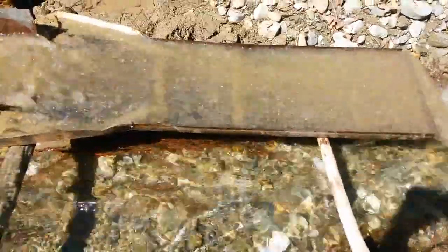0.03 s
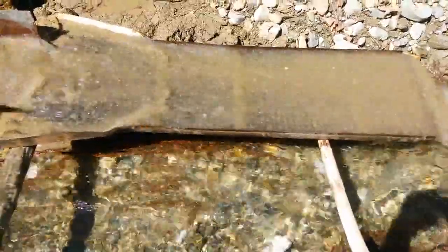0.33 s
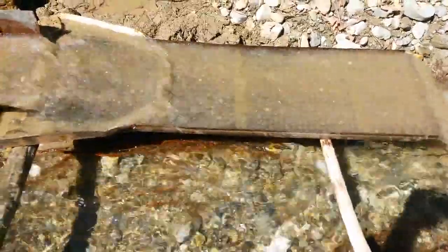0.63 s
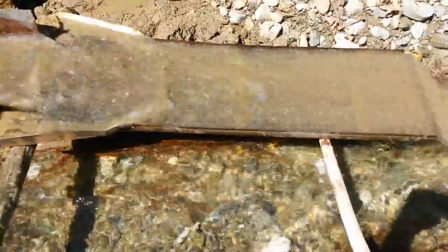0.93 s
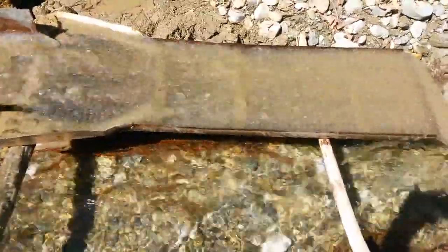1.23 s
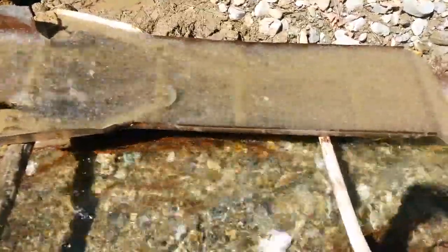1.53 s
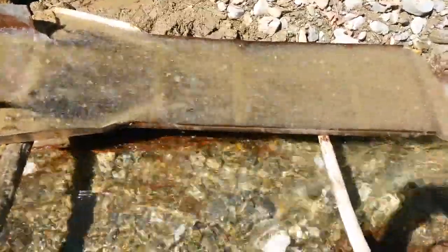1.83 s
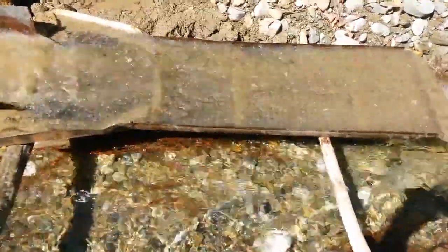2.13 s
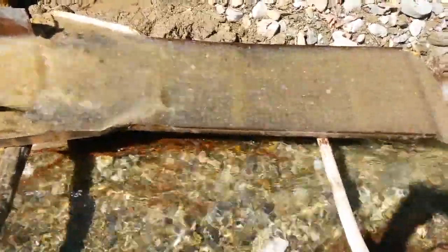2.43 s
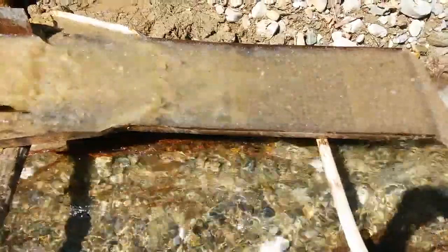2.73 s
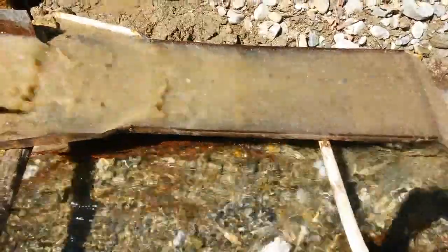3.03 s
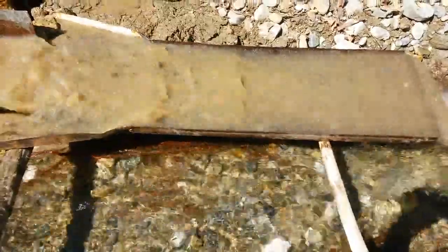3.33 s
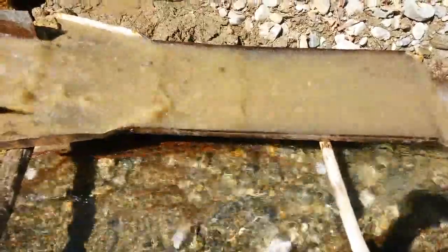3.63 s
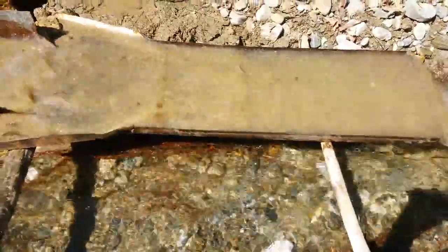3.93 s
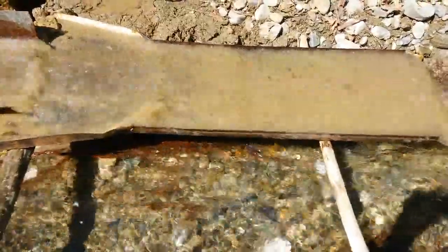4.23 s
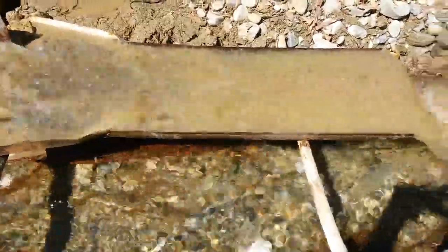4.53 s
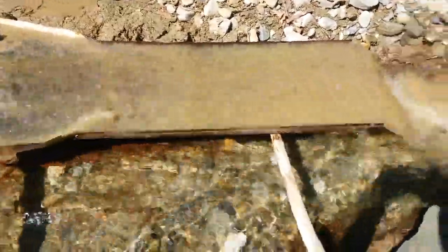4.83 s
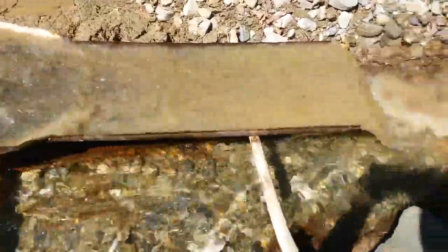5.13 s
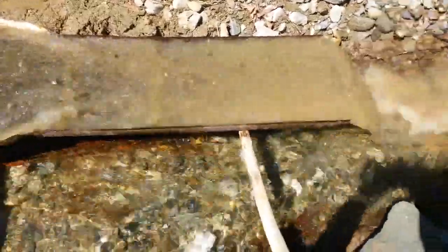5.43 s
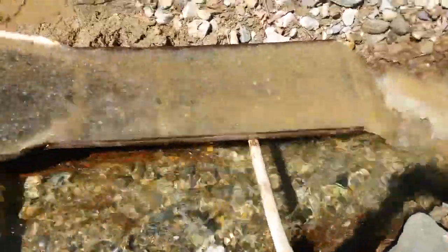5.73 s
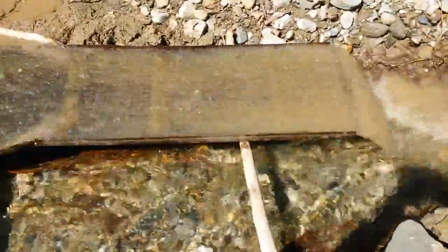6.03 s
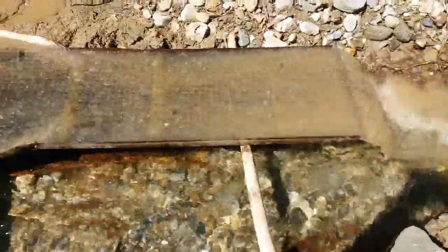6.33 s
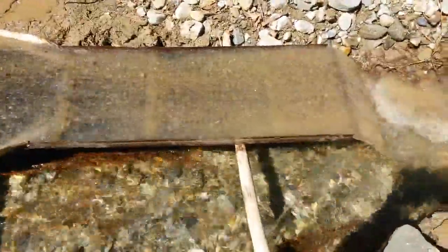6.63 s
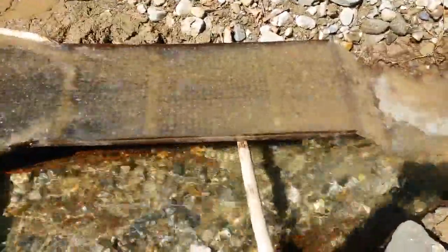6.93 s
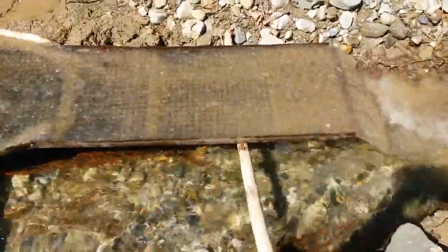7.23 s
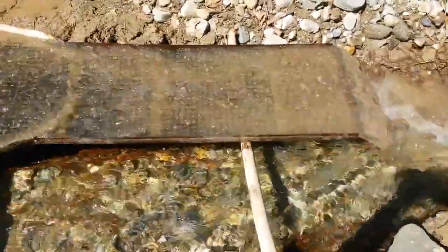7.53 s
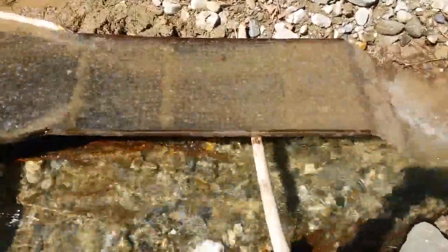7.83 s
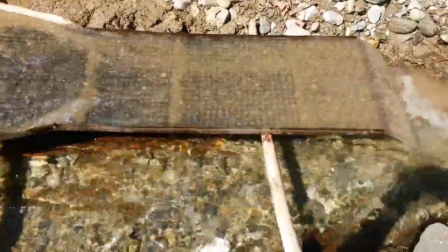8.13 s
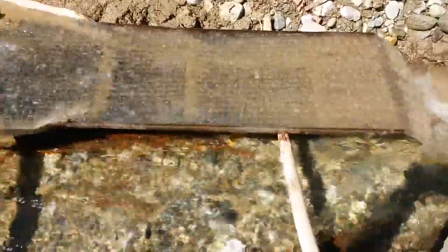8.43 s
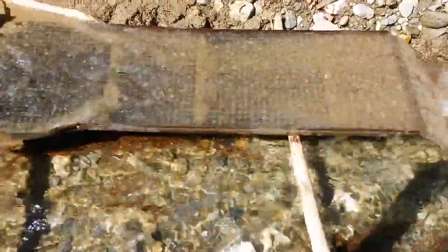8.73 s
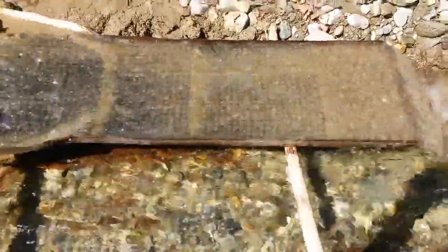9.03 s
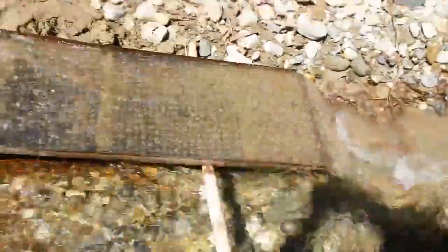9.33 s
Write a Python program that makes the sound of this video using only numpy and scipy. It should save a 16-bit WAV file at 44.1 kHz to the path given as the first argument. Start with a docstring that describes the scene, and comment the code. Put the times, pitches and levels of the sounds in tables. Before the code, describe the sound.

Close by outdoors, a rush of wet grit and splashing water opens, with small stones crunching and lumps slapping into a sluice box. A second strong load follows, then smaller washes of gravel, with bubbles and droplets over the faint fizz of a stream. Light wind puffs on the stereo microphone throughout, ending in a loud, crackling buffet on the left.

```python
"""Muddy water runs through a sluice box in a shallow stream while wet gravel is fed in at its head.
Loads slide and crunch, clods thud into the water, droplets plink; the current fizzes and burbles below.
Heard close by on a stereo microphone with a bright right port and a muffled left one, which swings
downstream midway. A breeze rumbles on both ports, and a last gust overloads the left."""
import sys
import numpy as np
from scipy import signal
from scipy.fft import rfft, irfft
from scipy.io import wavfile

SR = 44100
rng = np.random.default_rng(int(sys.argv[2]) if len(sys.argv) > 2 else 0)


def generate_wav(sig):
    """Save sig (samples, or channels by samples) to the path in sys.argv[1] as 16-bit PCM at SR."""
    pcm = np.round(np.clip(np.atleast_2d(sig).T, -1, 1) * 32767).astype(np.int16)
    wavfile.write(sys.argv[1], SR, pcm)


N = 414540
TIME, FREQ = np.arange(N) / SR, np.maximum(np.arange(N // 2 + 1) * SR / N, 1)


def undb(db):
    """Decibels to gain."""
    return 10 ** (np.asarray(db) / 20)


def across(points):
    """Join (Hz, value) points on a log-frequency axis."""
    hz, value = np.transpose(points)
    return np.interp(np.log(FREQ), np.log(hz), value)


def colour(x, points):
    """Filter x by a curve of (Hz, dB) points and scale it to an rms of 1."""
    y = irfft(rfft(x) * undb(across(points)), N)
    return y / y.std()


def resonances(modes):
    """Gain over frequency of a few (Hz, width Hz, dB) peaks."""
    return undb(sum(db / (1 + (2 * (FREQ - hz) / width) ** 2) for hz, width, db in modes))


def add(out, s, sound):
    """Mix a short sound into out at s seconds."""
    start = max(int(s * SR), 0)
    out[..., start:start + sound.shape[-1]] += sound[..., :max(N - start, 0)]


def impacts(rate, spread_db):
    """Randomly timed impulses of scattered level, about rate a second."""
    out, size = np.zeros(N), rng.exponential(size=N)
    hit = rng.random(N) < rate / SR
    out[hit] = undb(spread_db * np.minimum(size[hit], 4))
    return out


def grains(rate, spread_db):
    """Impacts heard two ways: directly (row 0) and scattered (row 1)."""
    return impacts(rate, spread_db) * rng.standard_normal((2, N))


def surges(rate, spread_db, fade_s, depth):
    """Gain of a chain of little surges, each starting at once and dying away."""
    power = signal.lfilter([1], [1, -np.exp(-1 / (fade_s * SR))], impacts(rate, spread_db) ** 2)
    return np.sqrt(1 - depth + depth * power / power.mean())


def bursts(rows, rise_s, hold_s):
    """Gain of (s, dB, t60) bursts that build up, hold briefly and fade."""
    power, t = np.zeros(N), TIME[:SR // 2]
    attack = 1 - np.exp(-t / rise_s)
    for s, db, t60 in rows:
        add(power, s, (attack * undb(db - 60 * np.maximum(t - hold_s, 0) / t60)) ** 2)
    return np.sqrt(power)


def swell(s, build_s, hold_s, t60):
    """Gain that builds up from s seconds, gently at first, holds at 1 and dies away."""
    gain, age = np.zeros(N), TIME[TIME < build_s + hold_s + t60]
    fade_db = -60 * np.maximum(age - build_s - hold_s, 0) / t60
    add(gain, s, np.clip(age / build_s, 0, 1) ** 1.6 * undb(fade_db))
    return gain


def bubble(hz, cycles, glide):
    """A ringing air pocket whose pitch climbs as it nears the surface."""
    age = np.arange(int(SR * cycles / hz) + 2) * hz / SR / cycles
    return np.sin(2 * np.pi * cycles * age * (1 + glide * age / 2)) * np.exp(-np.log(100) * age)


def bubbles(low_hz, high_hz, cycles, spread_db, count):
    """Bubbles of many sizes at random times, direct and scattered, rms 1."""
    out = np.zeros((2, N))
    for when, pitch, faintness, side in rng.random((count, 4)):
        ring = bubble(low_hz * (high_hz / low_hz) ** pitch, cycles, glide=0.16)
        gain = undb(-spread_db * np.log(max(faintness, .02)))
        add(out, when * N / SR, gain * np.outer([1, 2 * side - 1], ring))
    return out / out.std()


# The microphone's swing. Each row: time in seconds, share of the turn from 0 to 1.
MIC_SWING = [(3.6, 0.14), (4.8, 1)]

def turn():
    """How far the microphone has swung downstream, 0-1."""
    return np.interp(TIME, *np.transpose(MIC_SWING))


# The fizz over the riffles. Each row: frequency in Hz, relative level in dB.
FIZZ_SPECTRUM = [(110, -30), (180, -10), (572, -5.5), (771, -7), (1000, -7), (1540, -8.5), (1920, -5),
                 (2270, -6.5), (3620, -6), (4880, -6.5), (6820, -1), (9370, -18), (15500, -29.5)]

def stream(churn_level):
    """The current fizzes in wavelets and burbles, livelier for a moment when gravel stirs it."""
    fizz = colour(grains(rate=9000, spread_db=-1), FIZZ_SPECTRUM)
    wavelets = surges(rate=130, spread_db=2.5, fade_s=0.008, depth=0.42)
    burble = undb(-15) * bubbles(low_hz=650, high_hz=2300, cycles=18, spread_db=2, count=600)
    spray = undb(-9) * bubbles(low_hz=5900, high_hz=7400, cycles=32, spread_db=2.5, count=900)
    spray *= undb(3 * turn())  # grows as the microphone turns to the outfall
    settle_s = 0.12
    keep = np.exp(-1 / (settle_s * SR))
    stirred = signal.lfilter([1 - keep], [1, -keep], churn_level)
    flow = np.hypot(undb(-35), undb(-6.5) * stirred)
    return flow * (undb(0.08) * fizz * wavelets + burble + spray)


# Puffs of air right on the microphone. Each row: start in seconds, level in dB.
BREEZE_PUFFS = [(0.3, -37), (0.53, -39), (0.72, -39), (0.84, -33), (1.33, -33), (1.5, -38), (1.71, -34),
                (1.88, -39), (2.1, -37), (2.72, -30), (3.44, -37), (3.68, -33), (3.82, -38), (4.19, -38),
                (4.56, -39), (4.9, -37), (5.12, -34), (5.38, -35), (5.7, -39), (6.79, -37), (6.95, -40),
                (7.49, -34)]

def breeze():
    """Light air rumbles steadily on each port separately and puffs up now and then."""
    rumble = colour(rng.standard_normal((2, N)),
                    [(8, 4.5), (25, -2), (60, -4), (110, -8), (200, -21), (500, -29), (2000, -80)])
    flutter = np.array([surges(rate=14, spread_db=-1, fade_s=0.01, depth=0.53) for _ in range(2)])
    puff_power = sum((undb(db) * swell(s, build_s=0.025, hold_s=0.04, t60=0.5)) ** 2
                     for s, db in BREEZE_PUFFS)
    return rumble * flutter * np.sqrt(undb(-45) ** 2 + puff_power)


# Loads sliding in at the head of the box. Each row: start, build-up, hold and t60 in seconds,
# then relative levels of grit and of churned water in dB.
GRAVEL_LOADS = [(0.05, 0.28, 0.0, 0.24, -15, -17.5), (0.39, 0.04, 0.05, 0.45, -27, -19.5),
                (0.52, 0.06, 0.15, 0.5, -28, -24), (0.75, 0.06, 0.15, 0.8, -36, -39),
                (1.09, 0.1, 0.06, 1.1, -33.5, -33), (1.71, 0.04, 0.17, 1.4, -29.5, -28.5),
                (2.62, 0.04, 0.08, 0.85, -20, -23), (2.8, 0.14, 0.08, 1.15, -23.5, -23.5),
                (3.23, 0.02, 0.07, 0.3, -40, -31), (5.15, 0.14, 0.01, 0.45, -27.5, -38),
                (5.36, 0.15, 0.19, 0.75, -27, -32.5), (6.99, 0.045, 0.01, 0.3, -26.5, -33),
                (7.06, 0.07, 0.14, 0.7, -28.5, -34), (8.1, 0.07, 0.0, 0.3, -32, -37),
                (8.15, 0.14, 0.17, 0.2, -33, -31), (8.49, 0.025, 0.16, 0.35, -27, -28.5),
                (8.72, 0.05, 0.03, 0.8, -25.5, -28), (9.29, 0.02, 0.07, 0.4, -28, -44)]

def loads():
    """Levels over time of the sliding grit and of the water it churns; both swell with each load."""
    power = sum(np.outer(undb([grit_db, churn_db]), swell(*shape)) ** 2
                for *shape, grit_db, churn_db in GRAVEL_LOADS)
    return np.sqrt(power)


# Grit with the microphone facing it, then turned downstream.
# Each row: frequency in Hz, relative level in dB.
GRIT_FACING = [(530, -39), (900, -5.5), (1210, -4.5), (1400, -4.5), (1770, -2.5), (2570, -7), (3300, -5),
               (3670, -7), (4180, -1.5), (5700, -1), (7060, 3.5), (10100, -21.5), (14600, -26),
               (15500, -35)]
GRIT_DOWNSTREAM = [(410, -32), (700, -17), (757, -11), (900, -8.5), (1220, -9), (1600, -10), (2000, -11.5),
                   (2990, -10.5), (3270, -10), (3870, -6), (5290, -8), (6760, 4), (7250, 2), (9350, -16),
                   (15500, -31.5)]

def wet_grit():
    """Hard contacts mix with tiny ringing bubbles; the tone shifts as the microphone swings."""
    contacts = grains(rate=14000, spread_db=1)
    rings = bubbles(low_hz=2870, high_hz=9200, cycles=44, spread_db=1, count=3000)
    grit = contacts / contacts.std() + undb(-10) * rings
    return (1 - turn()) * colour(grit, GRIT_FACING) + turn() * colour(grit, GRIT_DOWNSTREAM)


# Water under the gravel. Each row: frequency in Hz, relative level in dB.
CHURN_SPECTRUM = [(70, -24), (130, -9), (200, -3), (300, -6.5), (400, -5), (550, 0), (800, -2.5),
                  (1200, -3.5), (1900, -6.5), (3000, -7.5), (6000, -29)]

def churned_water():
    """Stirred water splashes and gurgles with bubbles."""
    gurgle = bubbles(low_hz=260.3, high_hz=2207, cycles=16.2, spread_db=1.5, count=2000)
    splash = grains(rate=4300, spread_db=1.8)
    return undb(-1.5) * colour(splash, CHURN_SPECTRUM) + undb(-5) * colour(gurgle, CHURN_SPECTRUM)


# Small heaps of stones giving way. Each row: start in seconds, relative level in dB, t60 in seconds.
HEAP_CRUNCHES = [(0.0792, -20, 0.09), (0.1494, -18.5, 0.08), (0.2538, -12, 0.12), (0.3686, -11.5, 0.05),
                 (0.5217, -13, 0.03), (0.5536, -6.5, 0.1), (0.602, -13, 0.045), (0.8106, -20, 0.052),
                 (0.8824, -21, 0.068), (0.9747, -16, 0.036), (1.052, -15, 0.059), (1.092, -11, 0.08),
                 (1.21, -21, 0.08), (1.332, -13, 0.09), (1.437, -24, 0.3), (1.702, -14.5, 0.099),
                 (1.756, -14.5, 0.09), (1.8813, -15, 0.053), (2.377, -21, 0.1), (2.478, -15, 0.032),
                 (2.5636, -19.5, 0.17), (2.6364, -16, 0.082), (2.715, -15, 0.12), (2.875, -19, 0.16),
                 (2.984, -11, 0.12), (3.052, -15, 0.1), (3.136, -19, 0.074), (3.3992, -21.5, 0.052),
                 (3.489, -17, 0.13), (3.8677, -23.5, 0.12), (3.8985, -22, 0.22), (4.0243, -17, 0.032),
                 (4.371, -18, 0.22), (4.4817, -22, 0.2), (5.118, -20, 0.07), (5.433, -14, 0.08),
                 (5.496, -17.5, 0.12), (5.631, -17, 0.2), (5.749, -16, 0.11), (5.778, -10, 0.11),
                 (5.988, -23, 0.07), (6.0965, -22, 0.052), (6.789, -24, 0.08), (6.9088, -17, 0.11),
                 (7.1914, -16, 0.08), (7.256, -16, 0.11), (7.4463, -23, 0.14), (8.006, -19.5, 0.09),
                 (8.2816, -17.5, 0.1), (8.324, -15.5, 0.059), (8.3888, -15.5, 0.097),
                 (8.4274, -14.5, 0.045), (8.511, -15.5, 0.13), (8.7231, -13, 0.08), (8.7345, -12, 0.059),
                 (8.7693, -8.5, 0.09), (8.917, -19, 0.07), (9.3033, -16, 0.059)]

def gravel(grit_level, churn_level):
    """Gravel slides in little avalanches and crunches as heaps give way, churning the water under it."""
    tumble = surges(rate=240, spread_db=2.0, fade_s=0.0066, depth=0.5)
    crunch = bursts(HEAP_CRUNCHES, rise_s=0.001, hold_s=0.0045)
    grit, churn = wet_grit(), churned_water()
    patter = surges(rate=130, spread_db=3.3, fade_s=0.0038, depth=0.2)
    grit_gain = np.hypot(undb(0.3) * grit_level * tumble * patter, undb(-3.5) * crunch)
    churn_gain = np.hypot(undb(-0.1) * churn_level * tumble, undb(-19.5) * crunch)
    return grit * grit_gain + churn * churn_gain


# The hollow box. Each row: frequency in Hz, width in Hz, boost in dB.
BOX_MODES = [(702, 290, 2), (1130, 120, 3)]

def sluice_box(feed):
    """The box rings under what falls into it; returns a spectrum."""
    return rfft(feed) * resonances(BOX_MODES)


# Clods dropping into the box. Each row: start in seconds, relative level in dB,
# pitch of the trapped air in Hz, t60 of the slap in seconds.
CLOD_DROPS = [(0.327, -11.5, 713, 0.25), (0.421, -10.5, 820, 0.06), (0.554, -6, 274, 0.15),
              (0.571, -8.5, 524, 0.2), (1.05, -14, 616, 0.14), (1.089, -11, 656, 0.25),
              (1.336, -10.5, 407, 0.17), (1.932, -24, 520, 0.2), (2.027, -20, 640, 0.11),
              (2.233, -22, 405, 0.25), (2.349, -26, 676, 0.2), (2.565, -27, 600, 0.25),
              (2.658, -13.5, 370, 0.092), (3.093, -17, 530, 0.11), (3.246, -17, 664, 0.12),
              (3.4, -20, 670, 0.15), (3.506, -19.5, 786, 0.098), (3.658, -24.5, 770, 0.2),
              (5.117, -21.5, 392, 0.16), (5.786, -23, 970, 0.12), (6.807, -24, 463, 0.13),
              (6.907, -20, 680, 0.2), (7.204, -19.5, 778, 0.071), (8.091, -24, 410, 0.18),
              (8.363, -19, 436, 0.071)]
# Their slap. Each row: frequency in Hz, relative level in dB.
SLAP_SPECTRUM = [(60, -13), (130, -12.5), (250, -2), (480, 2.5), (900, -4), (1400, -7.5), (2200, -10.5),
                 (5000, -33)]

def clods():
    """Each clod slaps the water, then the air that it drags under rings briefly."""
    slap_gain = bursts([(s, db, t60) for s, db, _, t60 in CLOD_DROPS], rise_s=0.00052, hold_s=0.0013)
    slaps = slap_gain * colour(grains(rate=4000, spread_db=2.5), SLAP_SPECTRUM)
    plops = np.zeros(N)
    for s, db, hz, _ in CLOD_DROPS:
        add(plops, s + 0.00303, undb(db) * bubble(hz, cycles=21, glide=0.027))
    return undb(-6) * slaps + undb(-3) * plops


# Large single bubbles in the riffles. Each row: start in seconds, relative level in dB, pitch in Hz.
RIFFLE_GULPS = [(3.934, -31.5, 253), (4.016, -29, 859), (4.394, -24, 1410), (4.413, -27.5, 254),
                (4.485, -24.5, 1610), (4.959, -31, 778), (7.144, -22, 970), (7.299, -26, 730)]

def gulps():
    """Larger air pockets ring for a moment as they break loose."""
    out = np.zeros(N)
    for s, db, hz in RIFFLE_GULPS:
        add(out, s, undb(db - 0.5) * bubble(hz, cycles=24, glide=.06))
    return out


# Single drops landing on the current. Each row: start in seconds, relative level in dB.
DROPS = [(5.89, -25), (6.5292, -22.5), (6.5953, -23.5), (7.6675, -22), (7.9097, -22), (9.084, -23.5),
         (9.1866, -22)]

def droplets(bubble_hz=6650, scatter=0.04):
    """A droplet ticks on the surface and leaves one tiny chirping bubble."""
    tick_gain = bursts([(s, db, .035) for s, db in DROPS], rise_s=0.00041, hold_s=0.0009)
    plinks = np.zeros(N)
    for (s, db), detune in zip(DROPS, rng.standard_normal(len(DROPS))):
        add(plinks, s, undb(db) * bubble(bubble_hz * (1 + scatter * detune), cycles=150, glide=0.1))
    ticks = tick_gain * colour(rng.standard_normal((2, N)), GRIT_FACING)
    return undb(-5.5) * ticks + undb(2) * plinks


# Gusts straight into the left port. Each row: start, build-up, hold and t60 in seconds, drive in dB.
LEFT_GUSTS = [(8.67, 0.06, 0.53, 0.22, -20.5), (9.232, 0.011, 0.028, 0.1, 1.5)]
# Eddies striking that port. Each row: start in seconds, drive in dB, the diaphragm's swing in Hz.
LEFT_EDDIES = [(8.93, -13, 80), (8.985, -11, 70), (9.123, -3, 60), (9.239, 9, 95)]

def gust(breakup_s=9.271, limit=.66):
    """A gust shakes the left diaphragm until it hits its limit, then breaks up into a crackling hiss."""
    rumble = colour(rng.standard_normal(N), [(6, -10), (18, -6), (32, 2.5), (60, -16), (130, -23.5),
                                             (400, -32), (1500, -50), (6000, -90)])
    buffet = colour(rng.standard_normal(N),
                    [(30, -7), (95, 2.5), (200, -11.5), (450, -19), (1000, -31), (4000, -72)])
    hiss = colour(rng.standard_normal(N),
                  [(100, -10), (450, 4), (900, 0), (2500, -7), (5000, -17), (10000, -24), (15000, -22)])
    force = sum(undb(db) * swell(*shape) for *shape, db in LEFT_GUSTS)
    crackle = undb(-7.5) * swell(breakup_s, build_s=.002, hold_s=.018, t60=.02)
    tail = undb(-22) * swell(breakup_s, build_s=.002, hold_s=.018, t60=.4)
    eddies = bursts([(s, db, .07) for s, db, _ in LEFT_EDDIES], rise_s=0.0004, hold_s=0.0025)
    turbulence = force ** 2 + undb(-5) * eddies  # small, fast eddies grow with the force squared
    push = rumble * force + undb(-1.5) * buffet * turbulence + hiss * (crackle + tail)
    t = TIME[:SR // 10]
    for s, db, hz in LEFT_EDDIES:
        add(push, s, -undb(db) * np.sin(2 * np.pi * hz * t) * np.exp(-t / 0.0084))
    return np.outer([1, 0], limit * np.tanh(push / limit))


# Surfaces near the microphone. Each row: delay in seconds, level against the direct sound in dB.
NEAR_ECHOES = [(.0024, -21.5), (.0059, -18.5)]
# The right port's cavity. Each row: frequency in Hz, width in Hz, boost in dB.
RIGHT_PORT_MODES = [(726, 60, 6), (1890, 320, 4.5), (4210, 670, 3.5), (7260, 300, 0.5)]
# The muffled left port. Each row: frequency in Hz, level against the right in dB.
LEFT_SHADE = [(150, 0.6), (500, 2), (900, -2), (1400, -6), (2000, -9), (2900, -7), (4200, -17), (7000, -22),
              (10000, -7), (15000, -6)]
# How alike the ports sound. Each row: frequency in Hz, coherence from 0 to 1.
PORT_COHERENCE = [(100, 0.97), (250, 0.94), (700, 0.73), (1100, 0.22), (2000, 0.15), (3500, 0.38),
                  (12000, 0.032)]

def ports(spectrum, bend_hz=850, lead_s=.00026):
    """Two quick echoes join in; the right port rings, the left is muffled and leads in the treble."""
    echoes = sum(undb(db) * np.exp(-2j * np.pi * FREQ * s) for s, db in NEAR_ECHOES)
    direct, scattered = spectrum * (1 + echoes)
    alike, shade = across(PORT_COHERENCE), undb(across(LEFT_SHADE))
    early = np.exp(2j * np.pi * np.maximum(FREQ - bend_hz, 0) * lead_s)
    left = shade * early * (np.sqrt(alike) * direct + np.sqrt(1 - alike) * scattered)
    right = resonances(RIGHT_PORT_MODES) * direct
    # the pair keeps its mean level whatever the balance
    mean = np.sqrt(1 + shade ** 2 + 2 * shade * np.sqrt(alike) * early.real * (FREQ < 2 * bend_hz)) / 2
    return undb(-3.5) * irfft(np.array([left, right]) / mean, N)


def lean(pair, left_db):
    """Shift a stereo sound by a level difference, positive to the left."""
    left, right = pair
    return np.array([left * undb(.7 * left_db), right * undb(-.3 * left_db)])


def scene():
    """The current lies to the right; the gravel falls further left until the microphone swings."""
    grit_level, churn_level = loads()
    water = stream(churn_level) + droplets() + gulps()
    current = lean(ports(rfft(water)), left_db=-3)
    box_spectrum = sluice_box(gravel(grit_level, churn_level) + clods())
    feed = lean(ports(box_spectrum), left_db=2 - 4 * turn())
    return undb(-1.44) * current + undb(-0.34) * feed + breeze() + gust()


def record(dry):
    """The recorder rounds the highest peaks and cuts the top."""
    ceiling, top_hz = .9, 15600
    lowpass = signal.ellip(10, .2, 80, top_hz, fs=SR, output="sos")
    return signal.sosfilt(lowpass, ceiling * np.tanh(dry / ceiling))


dry = scene()
out = record(dry)
generate_wav(out)
```